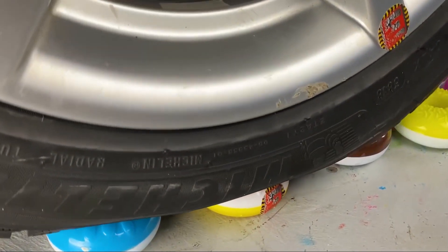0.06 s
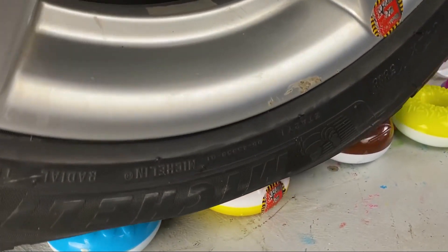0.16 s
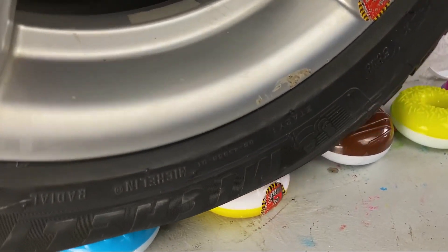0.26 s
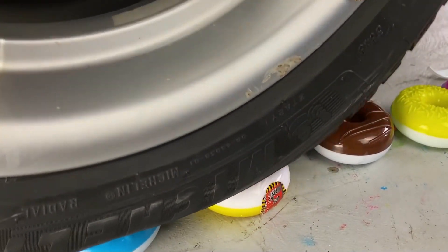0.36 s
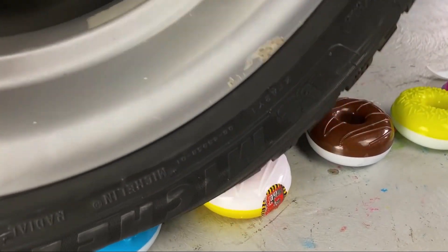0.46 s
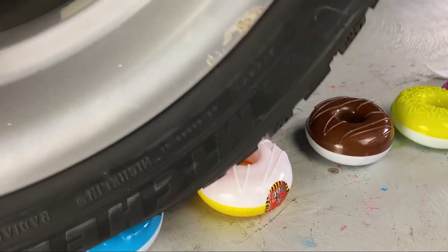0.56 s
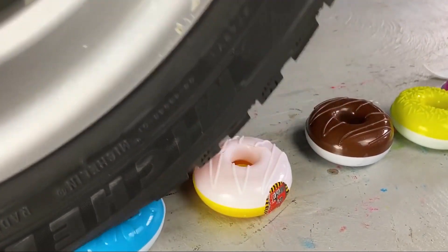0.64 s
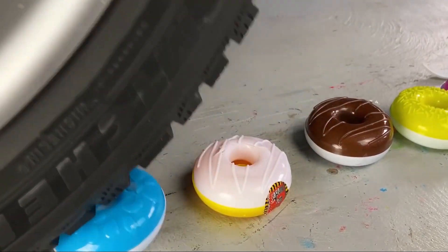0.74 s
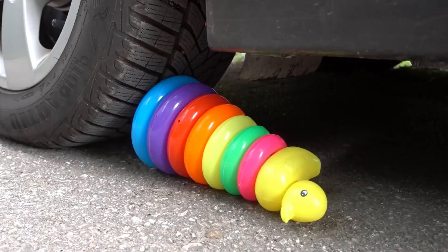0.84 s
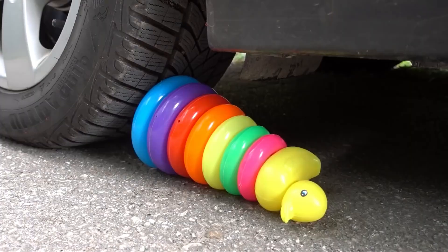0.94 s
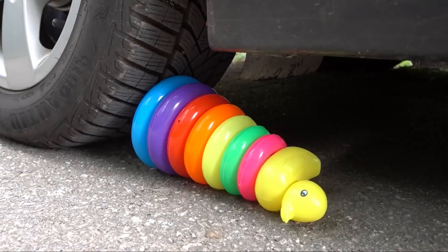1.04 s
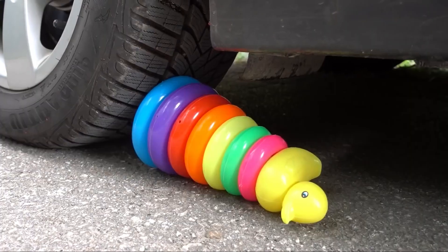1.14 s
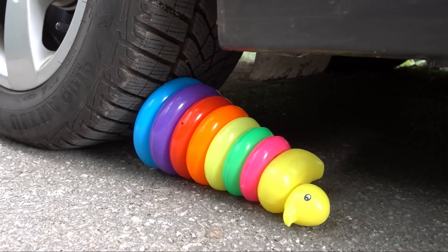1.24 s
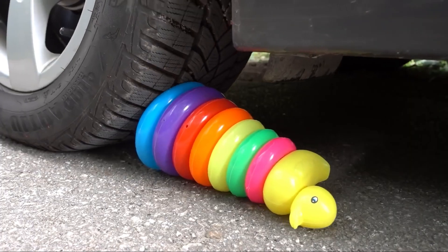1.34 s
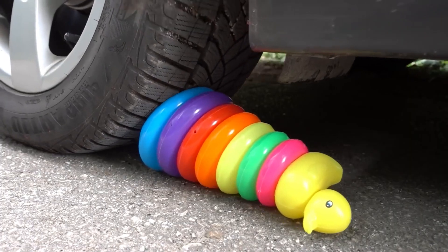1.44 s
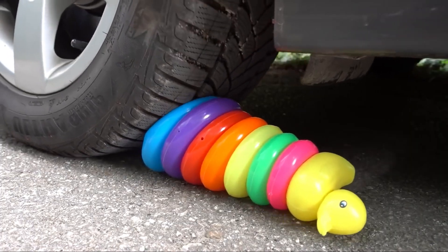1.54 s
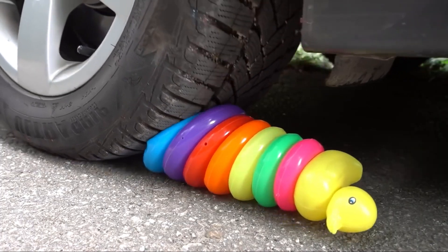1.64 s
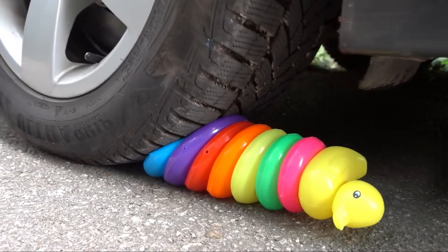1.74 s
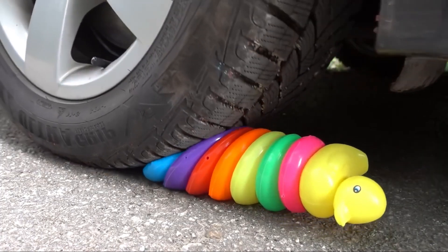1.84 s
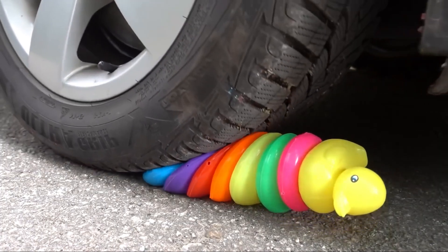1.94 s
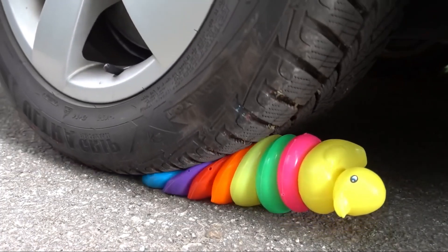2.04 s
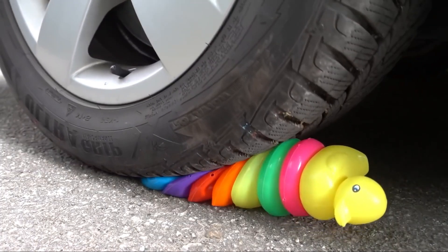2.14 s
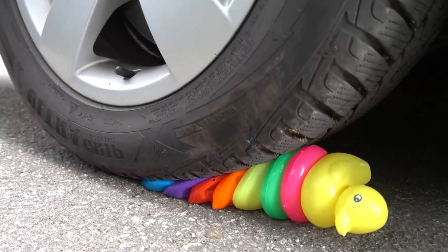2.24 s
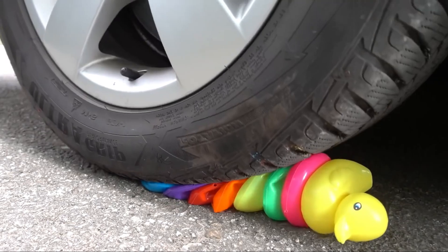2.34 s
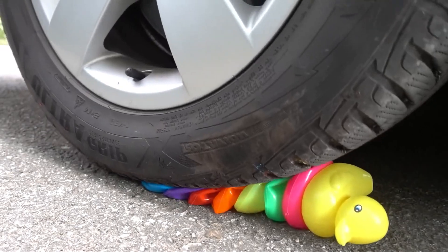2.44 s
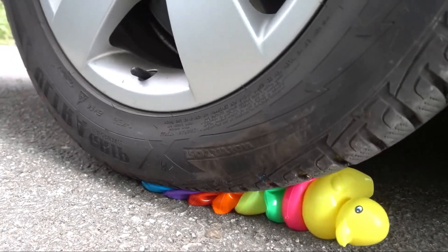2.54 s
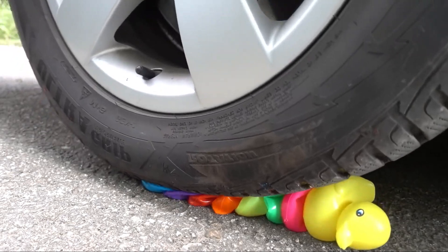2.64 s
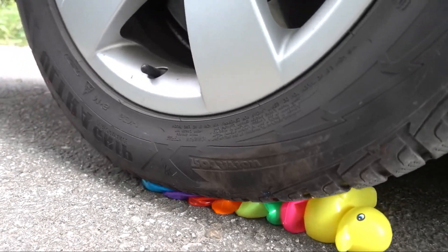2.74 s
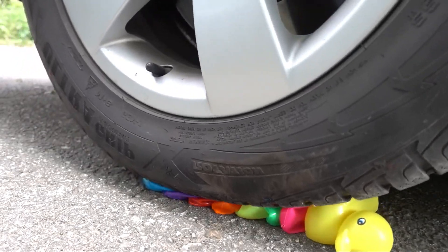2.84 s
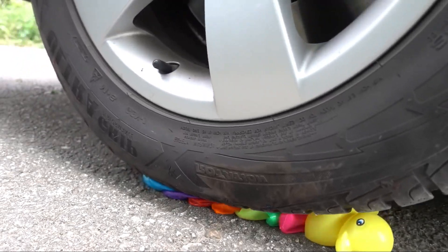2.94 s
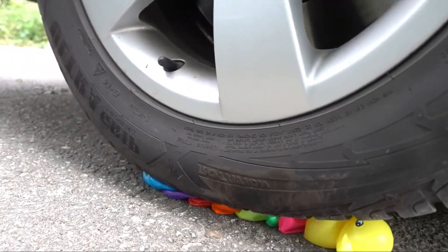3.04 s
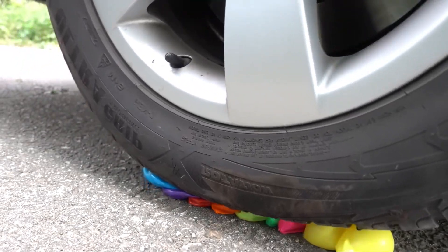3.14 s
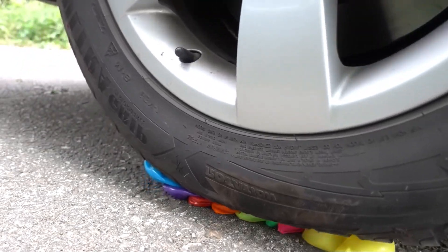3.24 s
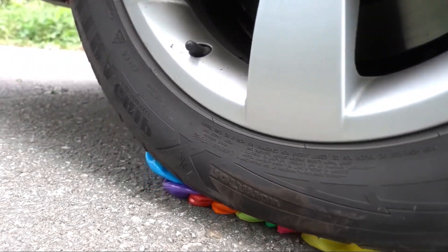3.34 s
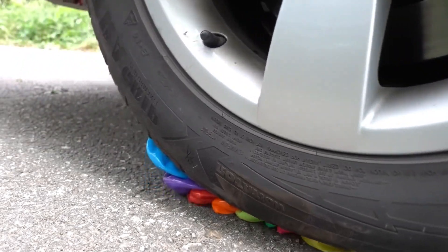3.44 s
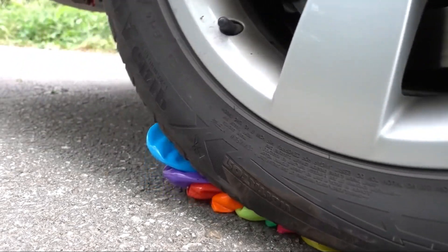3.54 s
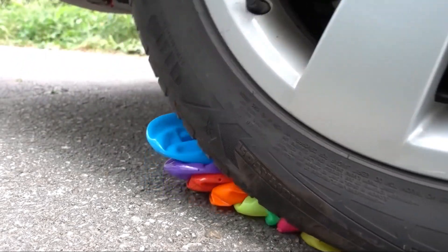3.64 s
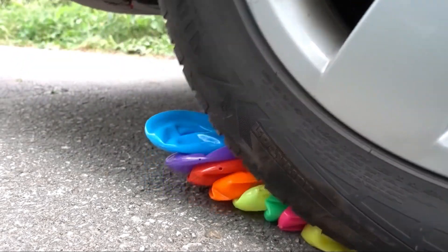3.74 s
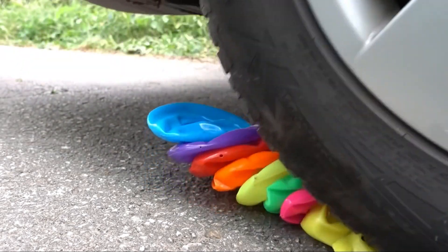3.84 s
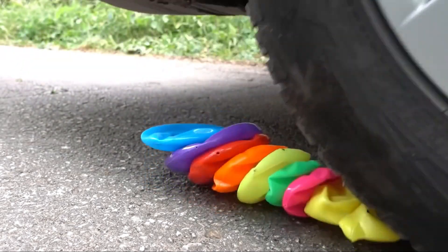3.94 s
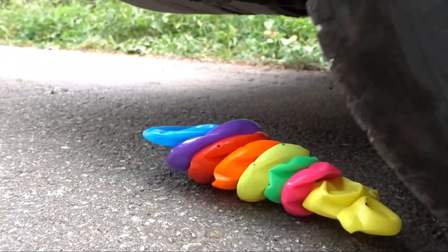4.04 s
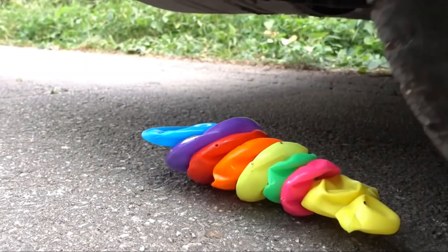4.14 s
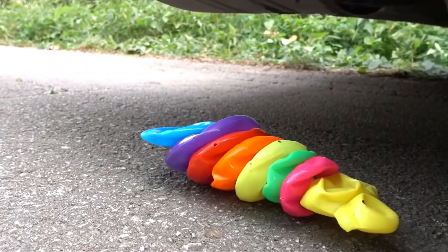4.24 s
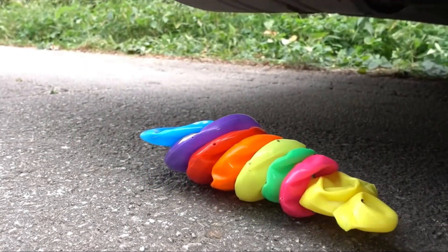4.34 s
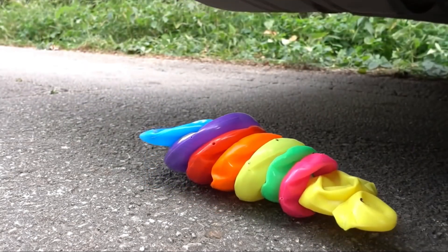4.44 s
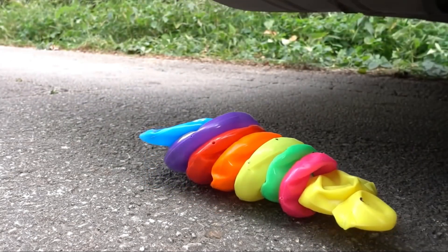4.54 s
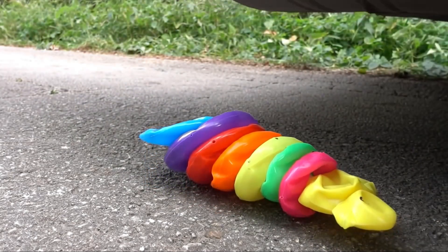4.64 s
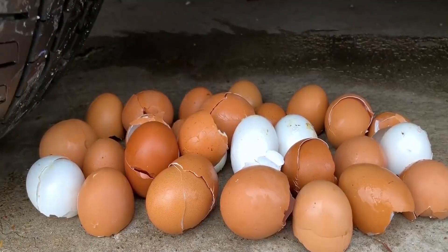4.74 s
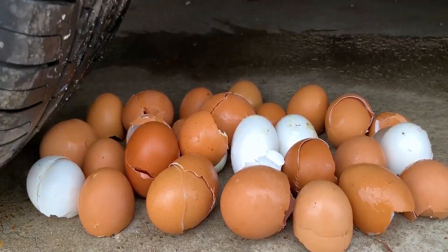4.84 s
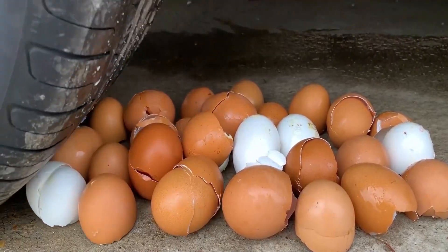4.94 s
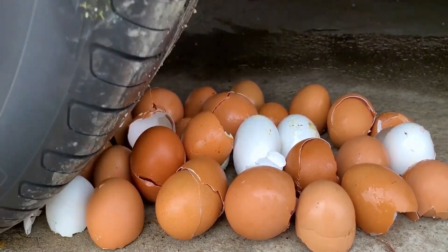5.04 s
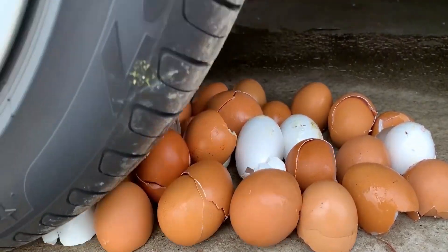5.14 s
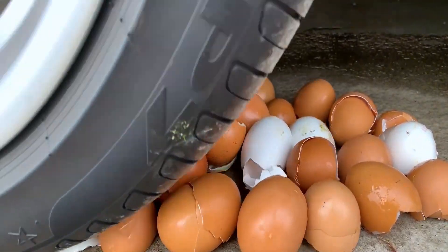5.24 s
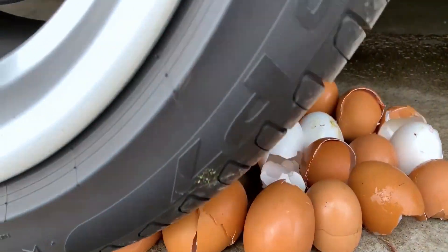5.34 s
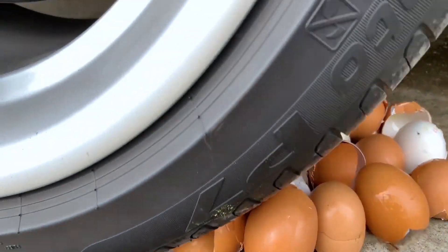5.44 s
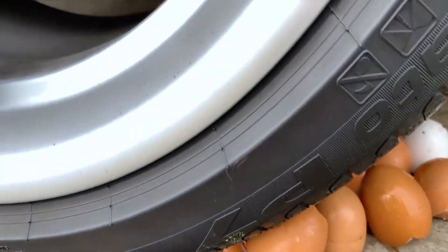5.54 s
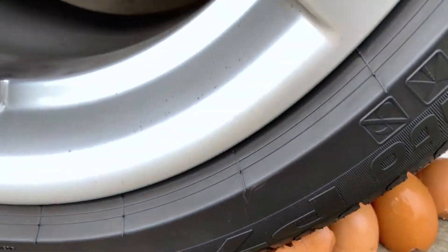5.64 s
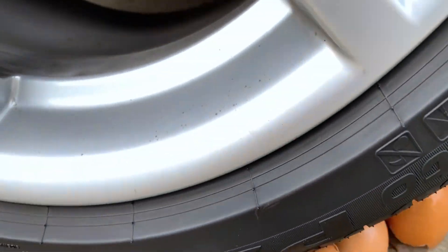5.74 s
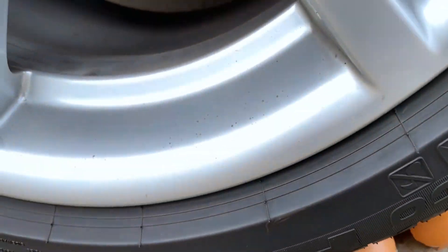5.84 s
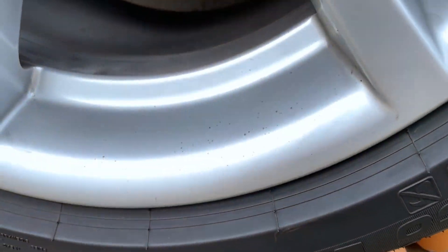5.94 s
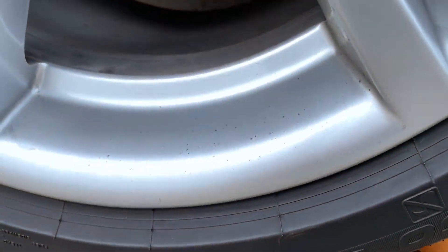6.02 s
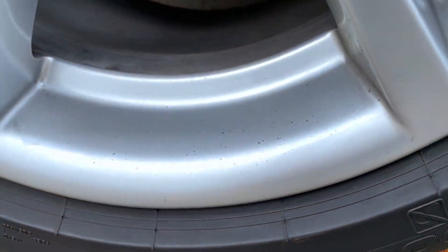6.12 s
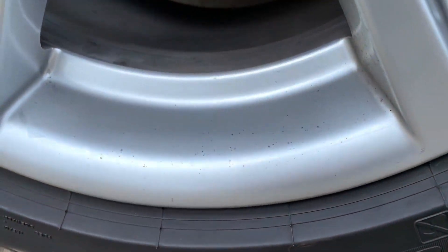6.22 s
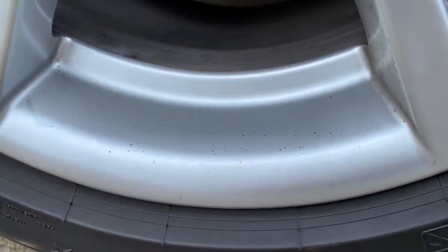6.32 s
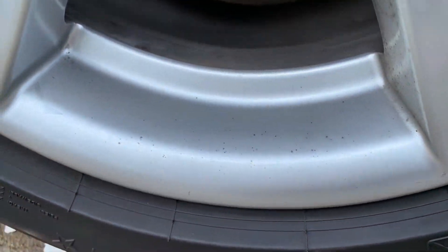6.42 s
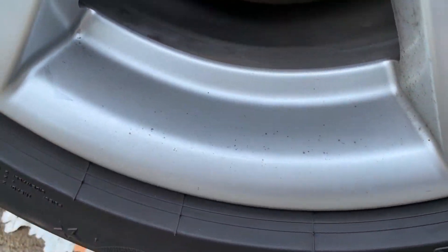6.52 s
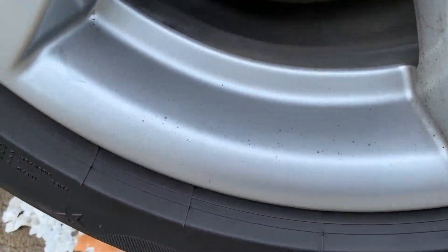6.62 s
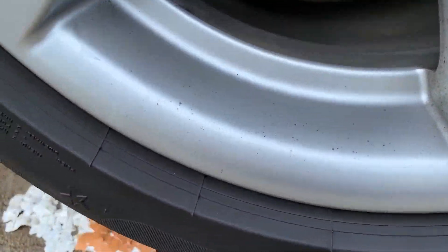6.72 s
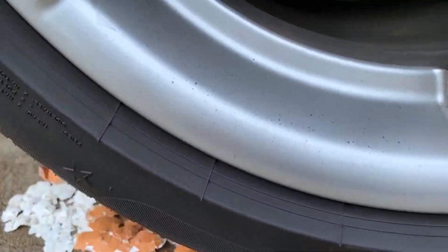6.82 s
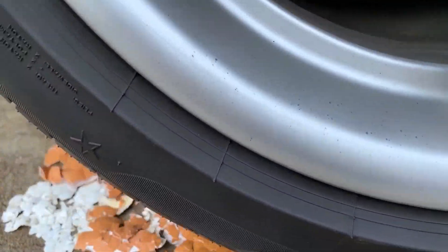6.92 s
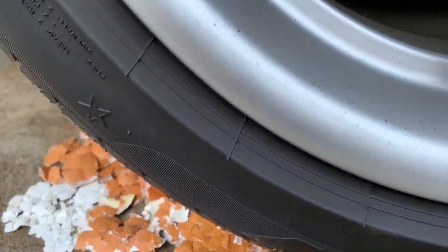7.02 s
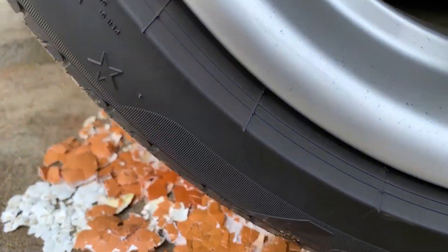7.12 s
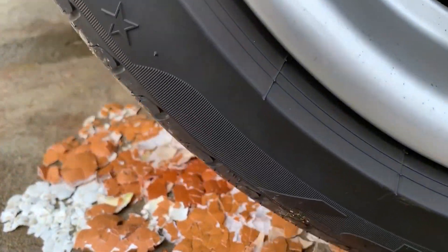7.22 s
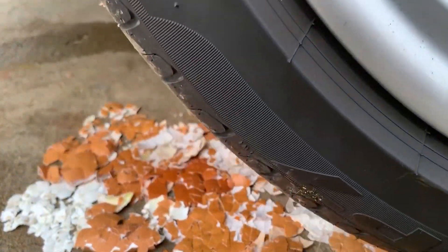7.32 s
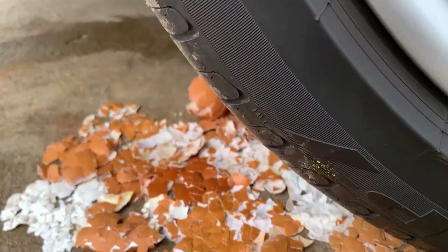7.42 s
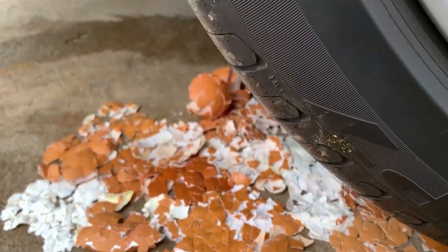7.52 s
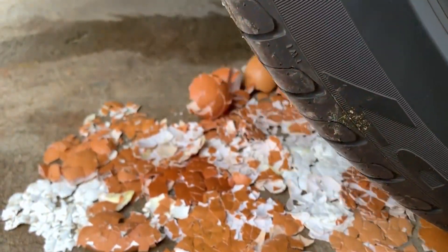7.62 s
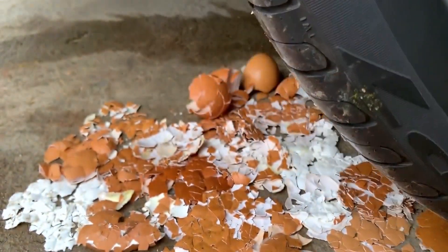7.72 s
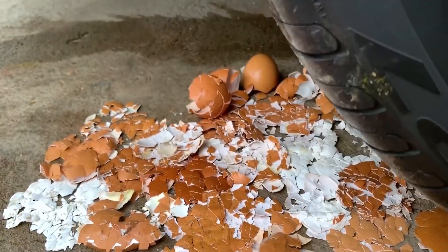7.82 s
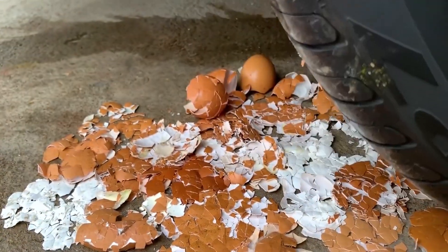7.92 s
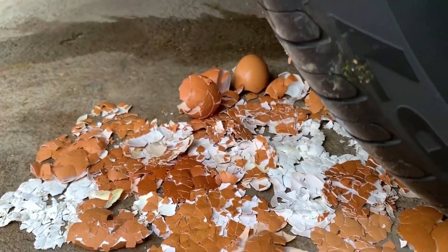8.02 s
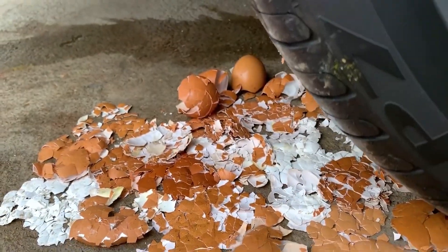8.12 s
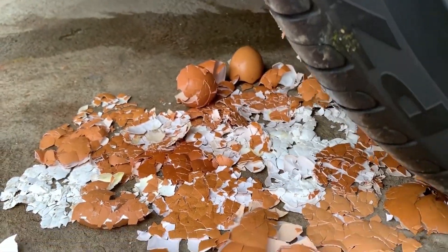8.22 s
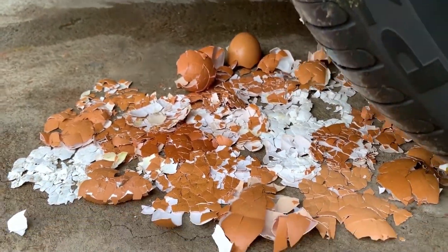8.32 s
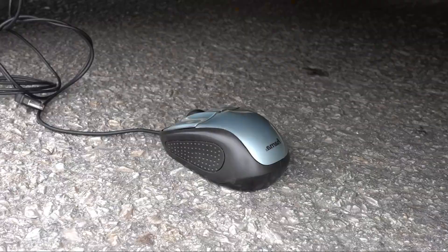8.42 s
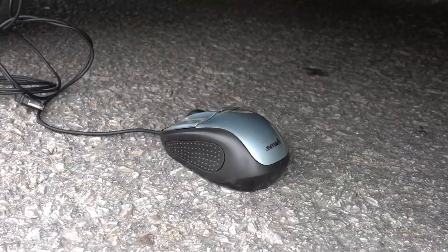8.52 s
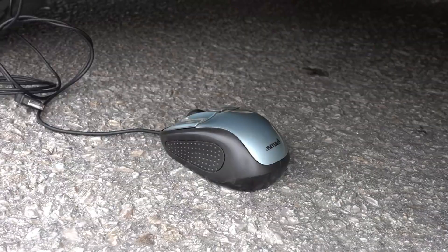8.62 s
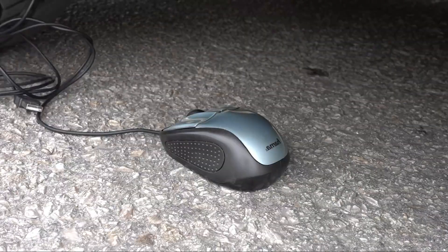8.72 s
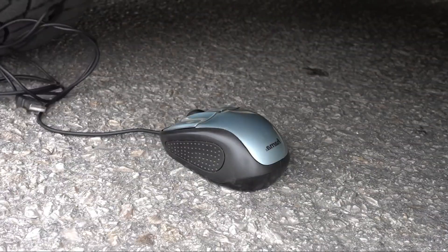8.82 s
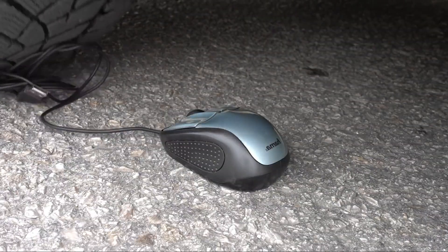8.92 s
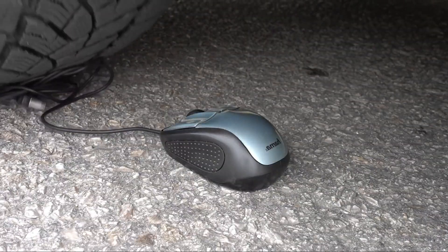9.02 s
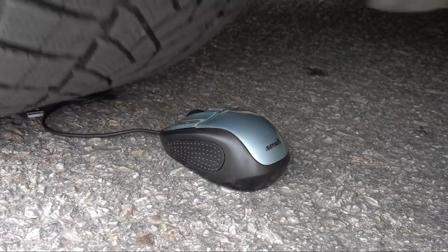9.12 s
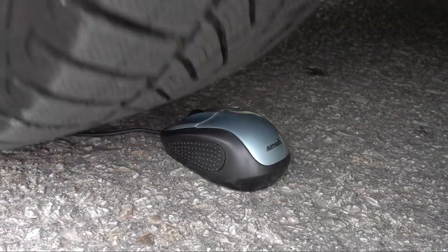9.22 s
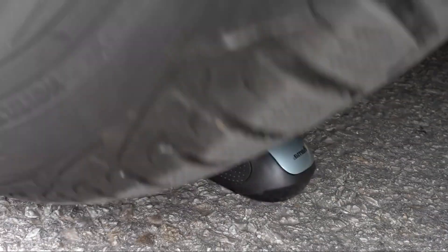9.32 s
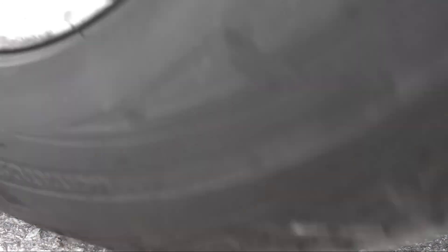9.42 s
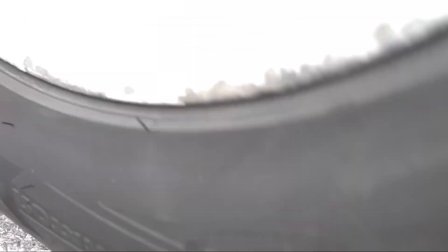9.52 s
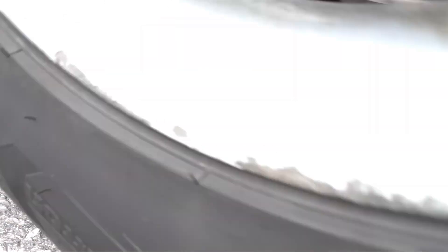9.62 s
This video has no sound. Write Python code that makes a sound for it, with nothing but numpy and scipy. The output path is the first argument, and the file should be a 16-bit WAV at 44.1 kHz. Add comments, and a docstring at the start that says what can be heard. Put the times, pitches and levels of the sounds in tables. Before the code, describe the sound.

An engine idles while a tyre rolls over four things in turn. Plastic rings pop briefly, close and mono. A hollow toy then snaps, buckles and hisses air in wide, duller stereo. Eggshells follow, loud, bright and dense with sharp cracks, in mono. Last, a computer mouse gets soft thumps and a sudden hard break, wide and dull. Outdoors, close microphone, abrupt cuts.

```python
"""A car tyre rolls slowly over four things in turn, with short gaps, an engine idling and the tyre's air cavity humming.
First plastic rings crunch and pop in mono; then a hollow toy buckles in wide stereo, duller, its air hissing out.
Then eggshells crack and crunch in mono, with engine tones close by; last a computer mouse breaks, wide and duller.
Crushing is clumped random fractures in coloured bands; pops, scrapes, snaps and thumps are pushes into resonances."""
import sys
import numpy as np
from scipy import signal
from scipy.io import wavfile

SR = 44100
rng = np.random.default_rng(int(sys.argv[2]) if len(sys.argv) > 2 else 0)


def unload_wav(signal):
    """Save mono or channel-first audio to the path in sys.argv[1] as 16-bit WAV at rate SR, clipped to [-1, 1]."""
    wavfile.write(
        sys.argv[1],
        SR,
        np.round(np.clip(np.atleast_2d(signal).T, -1, 1) * 32767).astype(np.int16),
    )


N = 426429

# The four places in turn. Each row: start in seconds, end in seconds, fade-in in seconds, top of the sound in Hz.
PLACE_SPANS = [(0, .852, .002, 15700), (.868, 4.718, .04, 11100), (4.738, 8.487, .028, 15700),
               (8.505, 9.67, .03, 11100)]
# Stereo image. One entry a place: 0 for mono, 1 for wide.
STEREO_WIDTH = [0, 1, 0, 1]


def amp(db):
    """Turn dB into gain."""
    return 10 ** (np.asarray(db) / 20)


def rms_one(x):
    """Scale to rms 1."""
    return x / np.sqrt(np.mean(x ** 2) + 1e-20)


def at_hz(points, hz):
    """Read the dB of a spectrum curve, straight between its points on a log-frequency axis."""
    points_hz, points_db = np.transpose(points)
    return np.interp(np.log(hz), np.log(points_hz), points_db)


def drift(rate_hz, size):
    """Slow random wander of rms 1: noise through a double one-pole low-pass, made at every 20th sample."""
    step = 20
    r = np.exp(-2 * np.pi * rate_hz * step / SR)
    noise = rng.standard_normal(size // step + 2002)
    slow = signal.lfilter([1], [1, -2 * r, r * r], noise)[2000:]   # drop the filter's settling
    return np.interp(np.arange(size) / step, np.arange(len(slow)), rms_one(slow))


def resonate(x, hz, width_hz):
    """One resonance from a pair of poles, with gain near 1 at its top."""
    r = np.exp(-np.pi * width_hz / SR)
    zeros = np.array([1, 0, -1]) * (1 - r * r) / 2
    return signal.lfilter(zeros, [1, -2 * r * np.cos(2 * np.pi * hz / SR), r * r], x)


def whistle(x, t, rows, width_hz):
    """A resonance gliding along rows of (s, Hz, strength dB), stepped in blocks; -60 dB before and after the curve."""
    s, hz, db = np.transpose(rows)
    hz = np.interp(t, s, hz)
    r = np.exp(-np.pi * width_hz / SR)
    zeros = [(1 - r * r) / 2, 0, (r * r - 1) / 2]
    out, state = np.zeros_like(x), np.zeros((len(x), 2))
    for i in range(0, len(hz), 256):
        block = slice(i, i + 256)
        poles = [1, -2 * r * np.cos(2 * np.pi * hz[i] / SR), r * r]
        out[:, block], state = signal.lfilter(zeros, poles, x[:, block], zi=state)
    return amp(np.interp(t, s, db, left=-60, right=-60)) * out


def coloured(sources, spectrum, low_hz, high_hz, patchy_db, patch_rate, wide):
    """Bands about a third of an octave wide, from two (mid, side) sources in turn, patchy in level; mid rms 1."""
    # Side level under the mid where the stereo is wide. Each row: frequency in Hz, level in dB.
    side_db = [(60, -9), (180, -8), (550, -3), (2500, 0)]
    edges = np.geomspace(low_hz, high_hz, int(3 * np.log2(high_hz / low_hz)) + 2)
    out = 0
    for k, (low, high) in enumerate(zip(edges, edges[1:])):
        source = sources[k % 2][:1 + wide]
        band = signal.sosfilt(signal.butter(2, [low, high], "band", fs=SR, output="sos"), source)
        hz = np.sqrt(low * high)
        band[1:] *= amp(at_hz(side_db, hz))
        patches_db = patchy_db * drift(patch_rate, band.shape[1])
        out = out + band * amp(at_hz(spectrum, hz) + patches_db)
    return out / np.sqrt(np.mean(out[0] ** 2))


def bursts(t, rows, rise_db_per_s, fall_db_per_s):
    """Power over time of events (s, dB, hold s): each rises, holds and falls at a steady dB rate."""
    out = np.zeros(len(t))
    for s, db, hold in rows:
        near = slice(*np.searchsorted(t, [s - .2, s + hold + .4]))
        rise_db = rise_db_per_s * np.maximum(s - t[near], 0)
        fall_db = fall_db_per_s * np.maximum(t[near] - s - hold, 0)
        out[near] += amp(2 * (db - rise_db - fall_db))
    return out


def firing_orders(t):
    """Engine close by: sines at multiples of one slightly wavering firing rate, each wobbling in level."""
    # Engine orders. Each row: multiple of the firing rate, rms level in dB around which it wobbles,
    # before the background level curve.
    orders = [(1, -36), (3, -42), (4, -41), (5, -42), (12, -46.5), (18.5, -57), (42, -54), (48.5, -56.5),
              (76.1, -57.5), (79.5, -60), (103.2, -57)]
    firing_hz, wobble_db, twelfth_from_s = 23.84, 2.5, 7.15
    turn = 2 * np.pi * firing_hz * np.cumsum(1 + 0.000573 * drift(0.89, len(t))) / SR
    out = np.zeros(len(t))
    for multiple, level_db in orders:
        # the twelfth order fades in late, over a tenth of a second
        sounding = np.clip((t - twelfth_from_s) * 10, 0, 1) if multiple == 12 else 1
        level = np.sqrt(2) * amp(level_db + wobble_db * drift(6.9, len(t)))
        out += sounding * level * np.sin(multiple * turn + rng.uniform(0, 5.2))
    return out


def idle(place, t):
    """Idling engine and street as patchy coloured noise; near the eggs the firing orders stand out as tones."""
    # Colour of engine and street, one curve a place. Each row: frequency in Hz, relative level in dB per Hz.
    spectra = [
        [(20, -16), (95, 0), (145, -19), (2110, -25.5), (8500, -48), (14000, -51), (15700, -51)],
        [(20, 3.5), (170, 17), (441, 1.5), (925, -5), (3200, -15.5), (11100, -43), (14400, -57)],
        [(20, 1), (107, 2), (239, -11), (283, -23), (354, -11), (863, -21), (1110, -12.5), (1550, -20.5),
         (2420, -17), (15700, -43.5)],
        [(20, 0), (131, -5), (205, -16), (1030, -29), (1110, -22.5), (1530, -19), (11100, -47), (14400, -87.5)],
    ]
    # Level of that noise before the background level curve. One entry a place: rms in dB.
    noise_db = [-55, -57, -34, -44]
    # Level of the whole background over time. Each row: time in seconds, added level in dB.
    background_level = [(0, 9.5), (.8, 6), (1.25, 14.5), (1.55, 11), (2.8, 5), (3.3, 5.5), (4.7, 8),
                        (4.75, 7.5), (5.1, -5), (6.4, -4.5), (6.7, 1.5), (7.6, 0.5), (8.45, 1.5), (8.6, 1),
                        (9.1, 7.5), (9.6, -8)]
    white = rng.standard_normal((2, 2, len(t)))
    out = amp(noise_db[place]) * coloured(
        white, spectra[place], 19.81, 1.15 * PLACE_SPANS[place][3],
        patchy_db=2.84, patch_rate=16.0, wide=STEREO_WIDTH[place])
    if place == 2:
        out[0] += firing_orders(t)
    return out * amp(np.interp(t, *np.transpose(background_level)))


def fractures(per_s, spread_db, clump_db, size):
    """Tiny breaks at random clumped moments over a fizz of noise; mid and side share moments, not signs."""
    give = (rng.random(size) < 90 / SR) * rng.exponential(1, size)   # a piece gives way at once
    surges = signal.lfilter([1], [1, -np.exp(-1 / (.0025 * SR))], give)   # its crumbs die out
    clumps = amp(clump_db * (2.4 * np.minimum(surges, 2) + 0.6 * drift(60, size)))
    born = rng.random((2, 1, size)) < per_s / SR
    sizes = amp(spread_db * np.minimum(rng.exponential(1, (2, 1, size)), 5))
    signs = rng.choice([-1, 1], (2, 2, size))
    fizz = 0.5 * rng.standard_normal((2, 2, size))
    return clumps * (born * sizes * signs + fizz)


def tyre_hum(hum_hz, waver_hz, hum_db, size):
    """Air inside the tyre hums: a sine wandering in pitch and level."""
    turn = 2 * np.pi * np.cumsum(hum_hz + waver_hz * drift(16.2, size)) / SR
    return amp(hum_db + waver_hz / 4 * drift(28.0, size)) * np.sin(turn)


def escaping_air(crackle, t):
    """Air squeezed from the toy whistles in three gliding resonances, with quieter hiss between them."""
    # The whistling bands, one curve a band. Each row: time in seconds, pitch in Hz, strength in dB.
    air_bands = [
        [(1.74, 2600, -15), (1.82, 2700, -13), (1.87, 4530, 5), (2.06, 4560, 4.5), (2.2, 3800, -3),
         (2.27, 3260, 6), (2.44, 2980, -3), (2.5, 2200, 3.5), (2.8, 2170, -1.5), (2.92, 2300, -26)],
        [(1.8, 6950, 7), (1.95, 7100, 15), (2.22, 6840, 22), (2.32, 6540, -10), (2.55, 4750, 8),
         (2.85, 5300, 3.5)],
        [(1.72, 8500, -2), (1.83, 9300, 11.5), (2.0, 9500, 7.5), (2.2, 9400, 21), (2.6, 9350, 13),
         (2.85, 8400, 6.5), (2.95, 7900, -33)],
    ]
    # Width of each resonance. One entry a band: width in Hz.
    widths_hz = [800, 1000, 1400]
    out = amp(-4) * crackle
    for k, (rows, width_hz) in enumerate(zip(air_bands, widths_hz)):
        out = out + (-1) ** k * whistle(crackle, t, rows, width_hz)
    return out


def eggshell_hollow(crunch, t):
    """The hollow of the eggshells under the tread adds a moving resonance to their crunch."""
    # Pitch of the hollow. Each row: time in seconds, pitch in Hz, strength in dB.
    hollow = [(5.02, 1500, 13), (5.078, 1400, 16), (5.18, 1300, 16), (5.25, 1700, 13), (5.32, 1400, -8),
              (5.885, 1500, -8), (5.9, 1650, 16), (5.985, 1500, 13), (6.02, 1600, -8), (6.33, 1700, 6),
              (6.53, 1500, 4), (6.635, 1800, -6), (6.65, 1500, 17), (6.685, 1350, 14), (6.72, 1400, -12)]
    return crunch + whistle(crunch, t, hollow, 280)


def shards(size):
    """Eggshell chips split off at random and ring some cycles each, over about three octaves; rms 1."""
    per_s, cycles = 260, 14
    clicks = (rng.random(size) < per_s / SR) * amp(2.7 * np.minimum(rng.exponential(1, size), 4))
    pitches_hz, dealt = np.geomspace(1100, 9500, 16), rng.integers(0, 16, size)
    out = 0
    for k, hz in enumerate(pitches_hz):
        chips = clicks * (dealt == k) + 1e-18
        out = out + resonate(chips, hz, 2.3 * hz / cycles) / np.sqrt(hz)
    return rms_one(out)


def tread_gains(place, t):
    """Gains of thud, crunch and crackle: the load, with the powers of jolts and cave-ins added."""
    # How hard the tread bears down, one curve a place.
    # Each row: time in seconds, crunch in dB, crackle and escaping air in dB.
    load = [
        [(0, -35.5, -58), (.2, -58.5, -83), (.27, -42, -50), (.36, -37.5, -47.5), (.5, -42.5, -62),
         (.66, -57.5, -72), (.85, -63, -55)],
        [(.88, -47, -57), (1.02, -86, -59), (1.35, -69, -58), (1.56, -38.5, -35.5), (1.71, -50.5, -45.5),
         (1.79, -45, -34), (2.1, -40, -36), (2.35, -48, -38), (2.55, -43.5, -36), (2.93, -50.5, -44),
         (3.26, -49.5, -48), (3.4, -46.5, -42.5), (3.68, -49.5, -41.5), (3.92, -36.5, -34), (4.12, -49, -46.5),
         (4.71, -49.5, -45)],
        [(4.76, -37.5, -42), (5.005, -36, -42), (5.025, -24.5, -20.5), (5.065, -34.5, -17.5),
         (5.09, -24.5, -17.5), (5.55, -18.5, -16.5), (5.9, -25, -24), (6.1, -27.5, -22.5), (6.42, -26, -24.5),
         (6.78, -24, -24), (7.0, -27, -28.5), (7.2, -34, -39), (7.45, -44.5, -44), (8.48, -51, -92)],
        [(8.52, -49.5, -98), (8.92, -56, -56.5), (9.05, -44, -59.5), (9.35, -40.5, -46), (9.47, -35, -36),
         (9.505, -14, -16.5), (9.57, -19.5, -30), (9.64, -24, -35), (9.647, -20, -25), (9.665, -18.5, -28)],
    ]
    # The thud follows the crunch. One entry a place: level against the crunch in dB.
    thud_under_db = [-3.5, -16, -12.5, -9.5]
    # A whole piece caves in, a rush of breaks.
    # Each row: time in seconds, crunch in dB, crackle in dB, hold in seconds.
    caves = np.array([(0.242, -22, -24.5, 0.0049), (0.442, -30, -45.5, 0.026), (5.616, -28, -37, 0.012),
                      (5.705, -25.5, -29, 0.019), (5.79, -23.5, -25, 0.038), (5.937, -26, -22.5, 0.22),
                      (6.519, -23, -20.5, 0.012), (6.706, -18, -35, 0.034), (7.126, -25, -26.5, 0.012),
                      (8.765, -39, -53.5, 0.017), (9.382, -29, -23, 0.056)])
    # The tyre drops as something yields and its carcass thuds.
    # Each row: time in seconds, level in dB, hold in seconds.
    jolts = [(0.001, -31.5, 0.0074), (0.237, -38.5, 0.19), (1.403, -48, 0.17), (1.704, -44, 0.41),
             (2.984, -41.5, 0.018), (4.089, -42, 0.022), (4.34, -39.5, 0.023), (5.852, -29, 0.031),
             (5.947, -30, 0.051), (6.26, -31.5, 0.031), (6.39, -31, 0.03), (6.57, -31.5, 0.077),
             (6.725, -26.5, 0.036), (6.864, -29.5, 0.032), (9.39, -31, 0.035), (9.526, -19.5, 0.016),
             (9.613, -24, 0.018), (9.66, -30, .01)]
    cave_rates, jolt_rates = (1494, 608), (488, 220)   # rise and fall, dB per s
    s, crunch_db, crackle_db = np.transpose(load[place])
    crunch_db, crackle_db = np.interp(t, s, crunch_db), np.interp(t, s, crackle_db)
    thud_power = amp(2 * (crunch_db + thud_under_db[place])) + bursts(t, jolts, *jolt_rates)
    crunch_power = amp(2 * crunch_db) + bursts(t, caves[:, [0, 1, 3]], *cave_rates)
    crackle_power = amp(2 * crackle_db) + bursts(t, caves[:, [0, 2, 3]], *cave_rates)
    return np.sqrt(thud_power), np.sqrt(crunch_power), np.sqrt(crackle_power)


def crushing(place, t):
    """Thud with the tyre's hum, crunch and crackle: three frequency ranges fed by one stream of fractures."""
    # How each thing breaks. Each row: fractures per second, size spread in dB, clumping in dB, patches in dB,
    # patches per second, tyre hum in Hz, hum waver in Hz (a quarter of it is its level waver in dB), hum level in dB.
    grain = [(5000, 2.5, 1, 2.5, 6.5, 212, 1.0, 8.5), (8290, 0.5, 0.7, 1.44, 23, 100, 4.5, -19),
             (2020, 4.3, 1.3, 1, 15, 215, 6.15, 0), (2500, 3, .9, 2.5, 17, 180, 15, -3)]
    # Where crunch gives way to crackle. One entry a place: frequency in Hz.
    crackle_from_hz = [2800, 1900, 2800, 2800]
    # Colour of each crushed thing. Each row: frequency in Hz, relative level in dB per Hz.
    rings = [(50, -10), (212, -2.5), (541, -10.5), (987, -3.5), (1550, -12), (2400, -12), (10400, -22),
             (12000, -8), (14300, -60), (15700, -15)]
    toy = [(50, -38), (255, -23), (334, -1.5), (428, 1), (673, 3), (1130, 4), (5510, -3), (8850, -10.5),
           (11100, 0), (14400, -70)]
    eggs = [(50, -9.5), (179, -8), (217, -6.5), (377, 0), (722, -1.5), (964, -2), (1450, -3.5), (2850, -3),
            (8600, -2.5), (15700, -5)]
    mouse = [(50, -25), (217, -6.5), (285, -10), (448, 2.5), (549, -0.5), (883, 4.5), (1130, -2),
             (8270, -14.5), (11100, -16), (14400, -56)]
    per_s, spread_db, clump_db, patchy_db, patch_rate, hum_hz, waver_hz, hum_db = grain[place]
    spectrum = [rings, toy, eggs, mouse][place]
    breaks = fractures(per_s, spread_db, clump_db, len(t))
    edges = [50, 300, crackle_from_hz[place], 1.15 * PLACE_SPANS[place][3]]
    thud, crunch, crackle = [
        coloured(breaks, spectrum, low, high, patchy_db, patch_rate, STEREO_WIDTH[place])
        for low, high in zip(edges, edges[1:])]
    thud[0] += tyre_hum(hum_hz, waver_hz, hum_db, len(t))
    thud /= np.sqrt(1 + amp(2 * hum_db) / 2)   # makes up for the hum's power
    if place == 1:
        crackle = escaping_air(crackle, t)
    if place == 2:
        crunch = eggshell_hollow(crunch, t)
        shard_db = -7
        crackle = (crackle + amp(shard_db) * shards(len(t))) / np.sqrt(1 + amp(2 * shard_db))
    thud_gain, crunch_gain, crackle_gain = tread_gains(place, t)
    return thud_gain * thud + crunch_gain * crunch + crackle_gain * crackle


def hits(rows, kick, swell, bare, body, tail, wide):
    """Each row (s, dB, Hz, sharpness, length s): a kick and a swelling, dying noise ring a resonance."""
    # Where the sound is. Each row: time in seconds, left over right in dB.
    sideways = [(1.1, -2), (1.9, -1), (3.4, 4), (3.8, -1), (3.95, 2), (4.35, -1), (9.2, -6), (9.4, 1.5)]
    size = 4410
    out, t = np.zeros((2, N + size)), np.arange(size) / SR
    rattles = rng.standard_normal((len(rows), 2, size))   # mid and side
    for (s, peak_db, hz, sharpness, length), rattle in zip(rows, rattles):
        age = t / max(length, .001)
        crumbs = tail * np.exp(-age / 3.8)
        push = rattle * (age ** swell * np.exp(-4 * age ** (1 + swell)) + crumbs)
        push[0, 0] += kick
        ring = resonate(push, hz, hz / max(sharpness, .5))
        ring = resonate(ring, hz, 1.7 * hz)   # a broad second pass softens the edge
        knock = resonate(push, hz / 2.1, hz / 4)   # the whole piece, lower
        overtone = resonate(ring, min(2.3 * hz, 15000), hz)
        mid, side = ring + bare * push + body * knock - .5 * overtone   # a little escapes uncoloured
        pan_db = np.interp(s, *np.transpose(sideways))
        ears = amp(peak_db + np.array([[pan_db], [-pan_db]]) / 2)
        at = round(s * SR)
        out[:, at:at + size] += ears * (mid + wide * side * [[1], [-1]]) / np.abs(mid).max()
    return out[:, :N]


def thumps():
    """The tyre thumps softly as it climbs and drops: a slow push without a kick, low in pitch."""
    # Soft thumps. Each row: time in seconds, peak level in dB, pitch in Hz.
    thump_rows = [(1.179, -25.5, 147), (1.214, -29, 102), (8.986, -21.5, 190), (9.024, -25, 121),
                  (9.086, -24, 79), (9.572, -10.5, 178)]
    rows = [(s, db, hz, 4.0, .048) for s, db, hz in thump_rows]
    return hits(rows, kick=0, swell=0.76, bare=0, body=0.18, tail=0, wide=0.2)


def scrapes():
    """A short scrape, rub or crumple: noise swells and fades in a resonance, without a kick."""
    # Short scrapes, rubs and crumples. Each row: time in seconds (the noise starts 5 ms earlier),
    # peak level in dB, pitch in Hz, length in seconds.
    scrape_rows = [(0.253, -26, 880, 0.037), (0.447, -22.5, 2320, 0.033), (0.599, -29, 785, 0.065),
                   (1.429, -28.5, 410, 0.14), (1.621, -18.5, 460, 0.034), (1.74, -20, 460, 0.011),
                   (1.753, -18, 514, 0.094), (1.935, -23, 563, 0.055), (1.981, -8, 606, 0.045),
                   (1.996, -23, 1600, 0.03), (2.12, -24.5, 900, 0.034), (2.419, -14.5, 725, 0.053),
                   (2.549, -17.5, 710, 0.045), (2.551, -25, 1800, 0.045), (3.962, -14.5, 1160, 0.036),
                   (4.333, -24, 407, 0.05), (4.335, -21.5, 1660, 0.036), (4.362, -23.5, 640, 0.051),
                   (6.682, -13.5, 3430, 0.13), (6.769, -12, 2400, 0.1), (6.788, -14.5, 3920, 0.11),
                   (9.037, -25.5, 1680, 0.013), (9.377, -7.5, 900, 0.06), (9.48, -10.5, 440, 0.0083),
                   (9.5, -11, 830, 0.026), (9.52, -7.5, 890, 0.015), (9.539, -8.5, 535, 0.03)]
    rows = [(s - .005, db, hz, 2.8, length) for s, db, hz, length in scrape_rows]
    return hits(rows, kick=0, swell=0.88, bare=0.0055, body=0.18, tail=0, wide=0.56)


def pops():
    """A wall buckles at once: a kick with a brief rattle rings its hollow."""
    # Buckling walls. Each row: time in seconds, peak level in dB, pitch in Hz,
    # sharpness of the ring (at least 0.5 used).
    pop_rows = [(0.0102, -13.5, 950, 1.9), (.254, -14, 590, 0.62), (0.467, -24, 880, 3.2),
                (1.12, -29, 930, 5.4), (1.632, -17, 660, 3.5), (1.735, -12, 420, 10), (1.833, -4, 613, 5.5),
                (2.436, -18, 786, 4.7), (2.979, -12.5, 327, 0.43), (2.978, -10, 660, 1.7),
                (3.766, -15, 630, 5.3), (3.884, -19.5, 660, 8.5), (3.95, -11, 1060, 2),
                (5.018, -8.5, 1340, 3.9), (5.079, -9, 1320, 2.9), (5.442, -2, 730, 2.2),
                (5.781, -4.5, 840, 1.7), (5.895, -3, 1550, 8.4), (6.183, -3, 780, 0.66),
                (6.189, -12, 900, 1.5), (6.447, -6.5, 1390, 1.2), (6.5757, -4.5, 1400, 0.87),
                (6.648, 1.5, 1340, 3.8), (6.736, -5, 1010, 0.79), (7.0, -7.5, 780, 2.1),
                (7.109, -5.5, 1180, 1.0), (9.217, -16, 1190, 2.8), (9.375, -9.5, 940, 2.5),
                (9.39, -6.5, 654, 1.1), (9.555, -4, 784, 3.7)]
    rows = [(*row, .008) for row in pop_rows]
    return hits(rows, kick=1.64, swell=0.048, bare=0.0059, body=0.37, tail=0.068, wide=0.17)


def snaps():
    """A wall snaps: a strong kick and a few milliseconds of slips in a broad resonance."""
    # Snapping walls. Each row: time in seconds, peak level in dB, centre in Hz.
    crack_rows = [(1.5644, -1.5, 2560), (1.632, -1, 2310), (1.834, -20, 2000), (3.024, -5.5, 3620),
                  (3.1574, -14.5, 3840), (3.4146, -8.5, 7240), (3.97, -11.5, 4000), (4.4486, -10.5, 3430),
                  (5.075, 3, 7750), (5.085, 1, 5600), (5.197, 0, 6140), (5.222, -12, 6000),
                  (5.285, 2.5, 5450), (5.301, -14, 3000), (5.433, 4, 6460), (5.456, -1, 2500),
                  (5.6927, 0, 5270), (5.699, -0.5, 6000), (5.778, 0.5, 6260), (5.791, -0.5, 6090),
                  (5.852, -2.5, 7050), (5.806, -3, 5960), (5.865, 0, 6410), (5.897, 2, 8700),
                  (5.935, 0, 7000), (5.952, 0, 6000), (6.069, 1.5, 6160), (6.1427, -10, 7220),
                  (6.2525, -2, 4730), (6.427, -2, 1800), (6.486, -0.5, 7800), (6.744, -1, 3880),
                  (6.8795, -2, 4500), (6.897, -4, 6100), (6.928, 2.5, 2750), (6.943, -9, 4500),
                  (6.955, -1.5, 2170), (7.107, -2, 2370), (7.174, -8.5, 2500), (7.296, -8.5, 1700),
                  (7.3932, -10, 6400), (8.2075, -19.5, 6100), (9.2175, -11.5, 6850), (9.484, 2, 5200),
                  (9.5548, 0.5, 3550), (9.592, -6, 2610), (9.645, -6.5, 2570)]
    rows = [(s, db, hz, .6, .0042 * amp(.5 * db)) for s, db, hz in crack_rows]   # louder snaps run longer
    return hits(rows, kick=2.5, swell=0.55, bare=0.36, body=0.99, tail=0.13, wide=0.5)


def scene():
    """The four places one after the other, each faded in, cut off and limited to its own top."""
    out = np.zeros((2, N))
    sharp = thumps() + scrapes() + pops() + snaps()
    for place, (start, end, fade, top_hz) in enumerate(PLACE_SPANS):
        here = slice(round(start * SR), min(round(end * SR), N))
        t = np.arange(N)[here] / SR
        mid_side = crushing(place, t) + idle(place, t)
        both = mid_side[0] + STEREO_WIDTH[place] * mid_side[-1] * [[1], [-1]]
        both += sharp[:, here] if STEREO_WIDTH[place] else sharp[:, here].mean(axis=0)
        top_cut = signal.ellip(10, .5, 60, top_hz, fs=SR, output="sos")
        fade_in = np.clip((t - start) / fade, 0, 1) ** 2
        cut_off = np.clip((end - t) / 0.0012, 0, 1)
        out[:, here] = signal.sosfilt(top_cut, both) * fade_in * cut_off
    return out


def record(dry):
    """The loudest peaks are rounded towards full scale, then a steep low-pass cuts the top."""
    rounded = dry / (1 + np.abs(dry) ** 4) ** .25
    cutoff_hz = 16600
    return signal.sosfilt(signal.cheby2(12, 70, cutoff_hz, fs=SR, output="sos"), rounded)


dry = scene()
out = record(dry)
unload_wav(out)
```